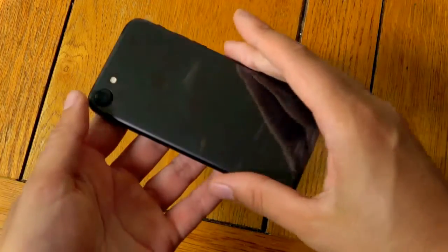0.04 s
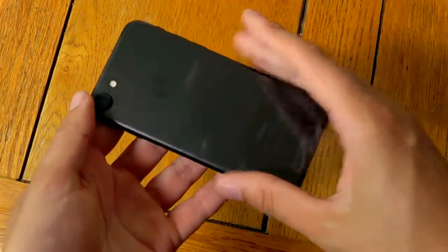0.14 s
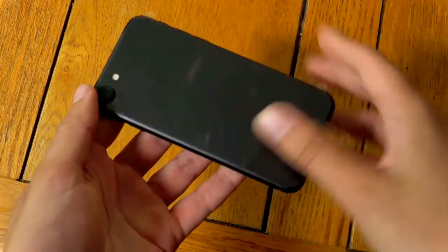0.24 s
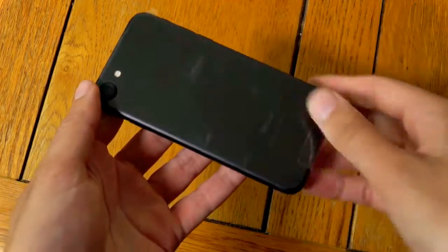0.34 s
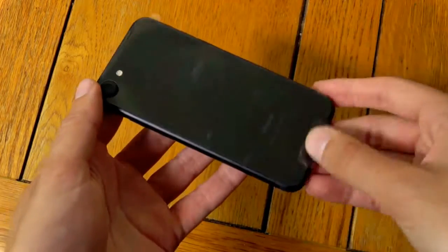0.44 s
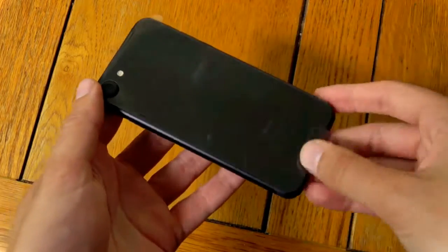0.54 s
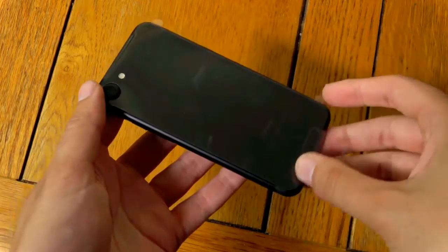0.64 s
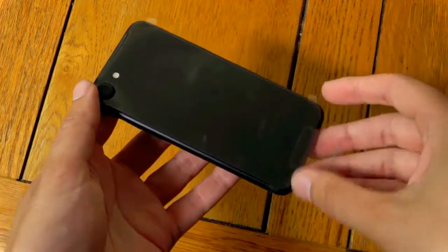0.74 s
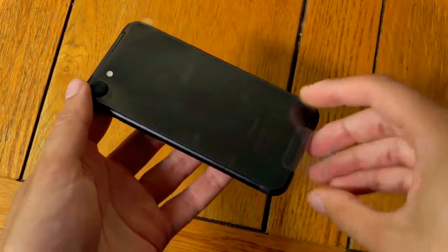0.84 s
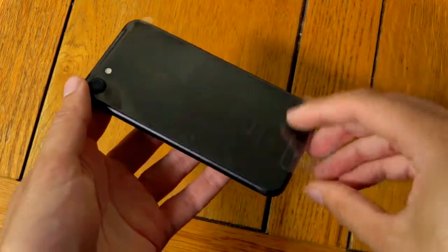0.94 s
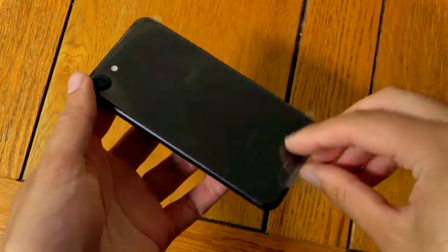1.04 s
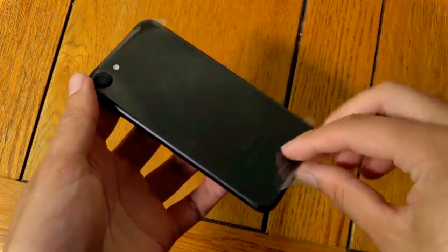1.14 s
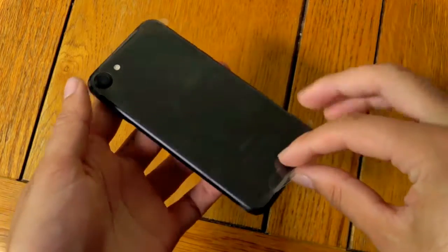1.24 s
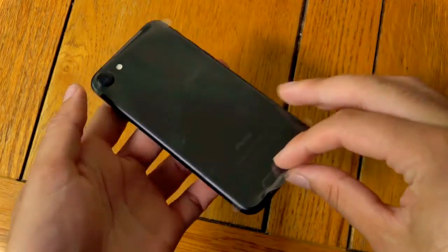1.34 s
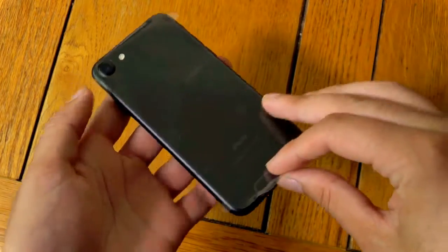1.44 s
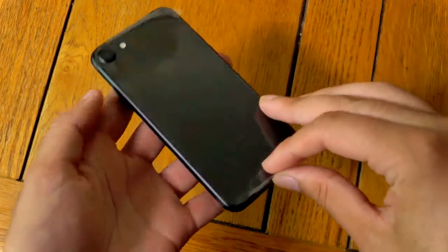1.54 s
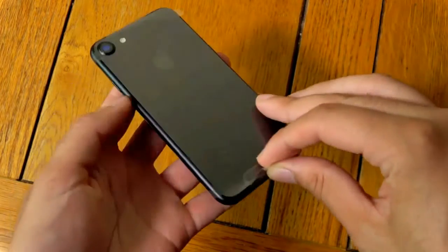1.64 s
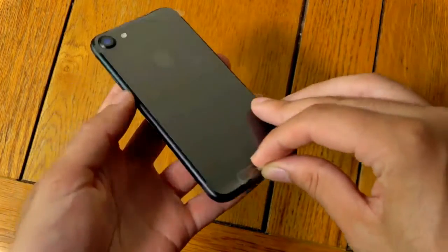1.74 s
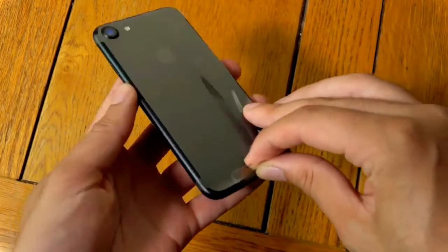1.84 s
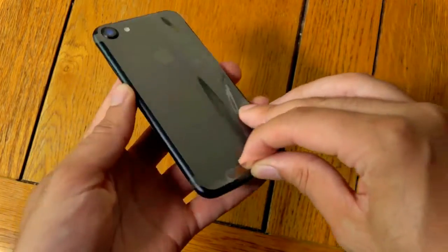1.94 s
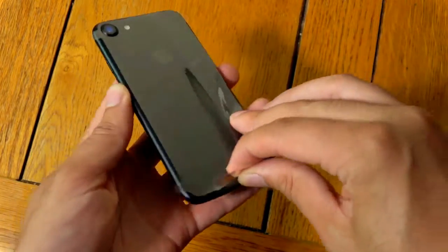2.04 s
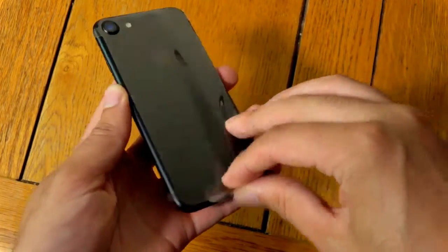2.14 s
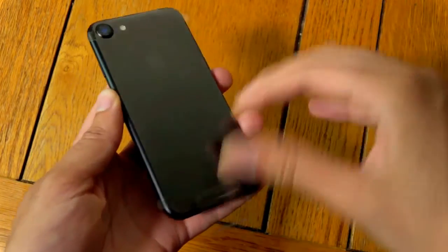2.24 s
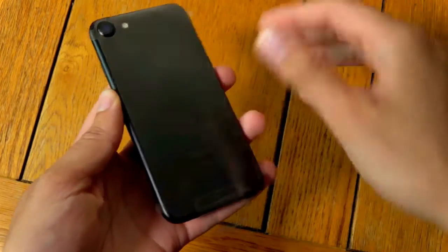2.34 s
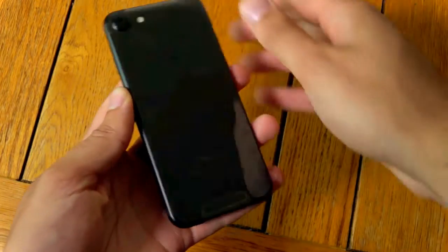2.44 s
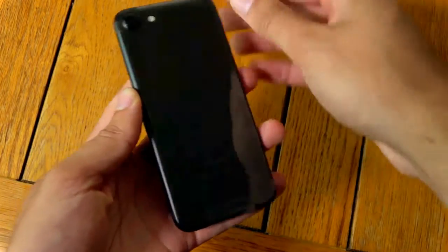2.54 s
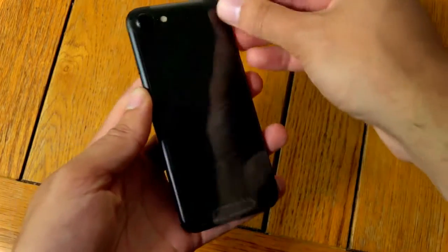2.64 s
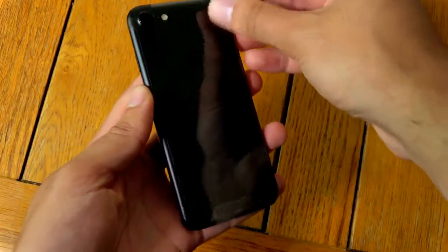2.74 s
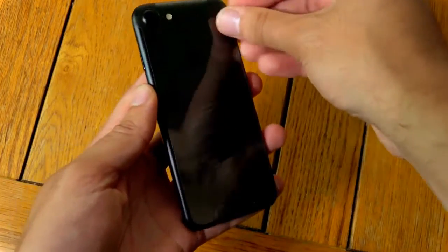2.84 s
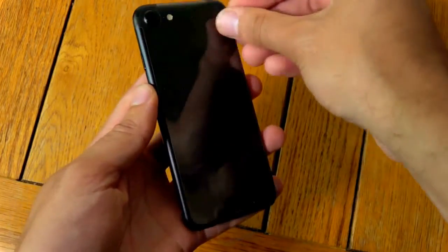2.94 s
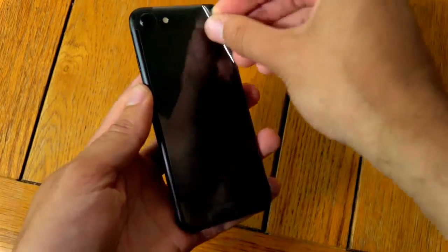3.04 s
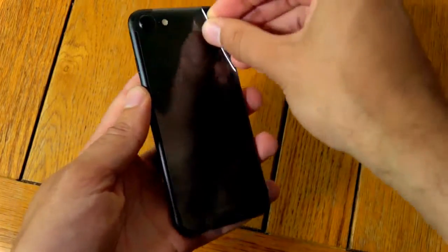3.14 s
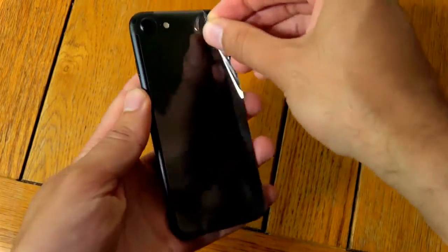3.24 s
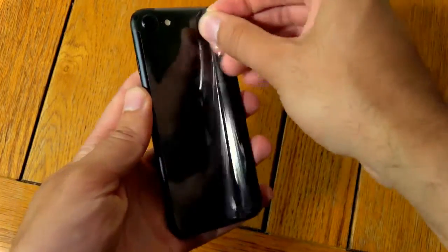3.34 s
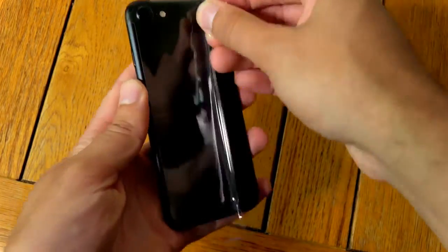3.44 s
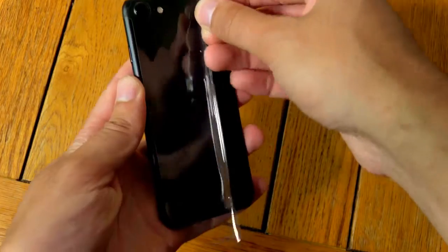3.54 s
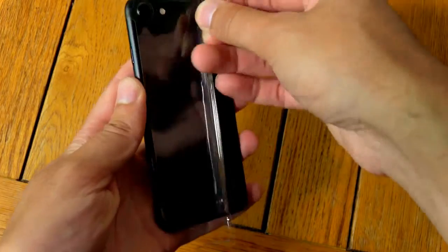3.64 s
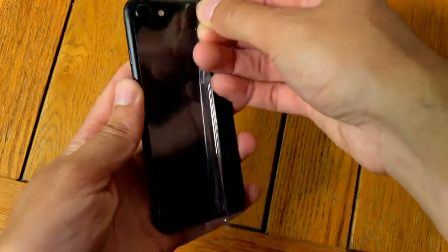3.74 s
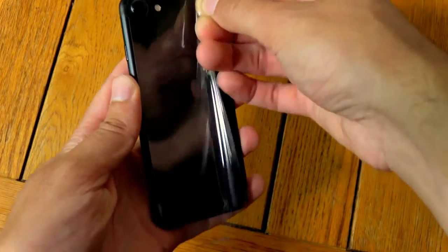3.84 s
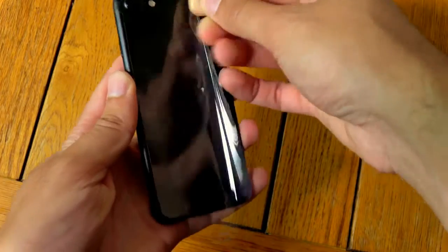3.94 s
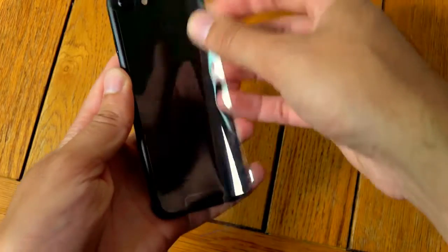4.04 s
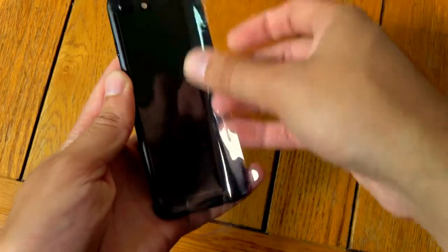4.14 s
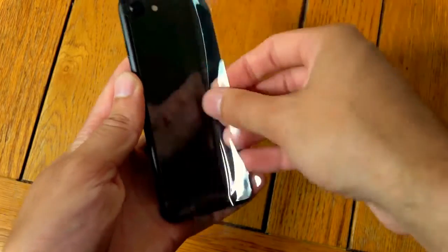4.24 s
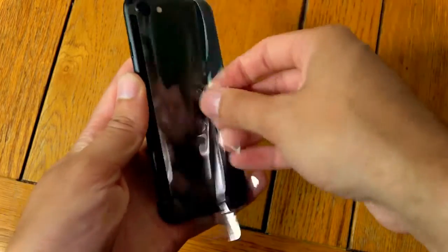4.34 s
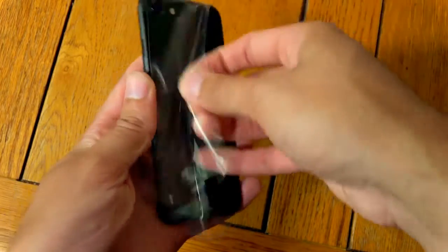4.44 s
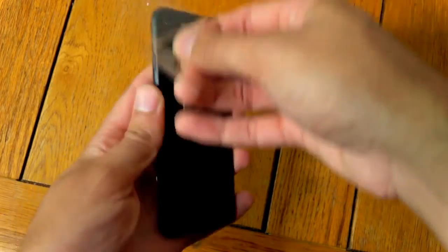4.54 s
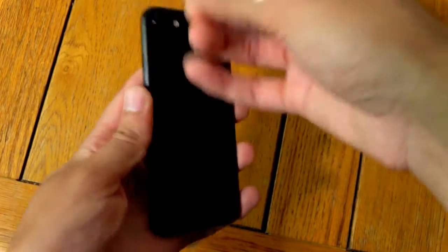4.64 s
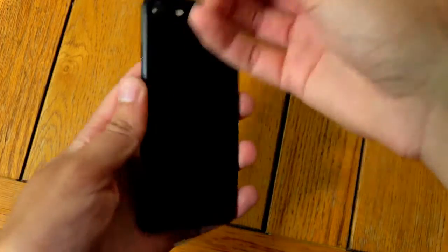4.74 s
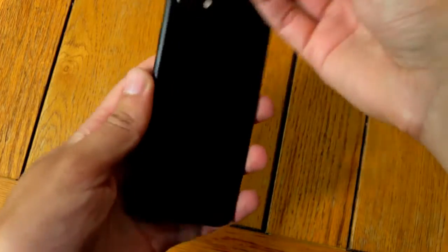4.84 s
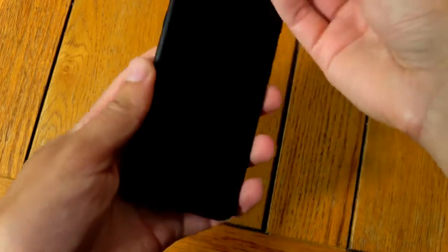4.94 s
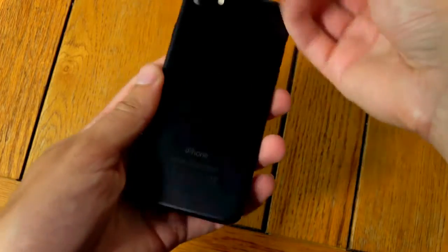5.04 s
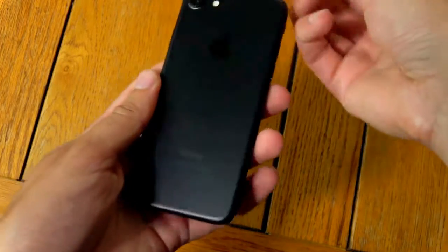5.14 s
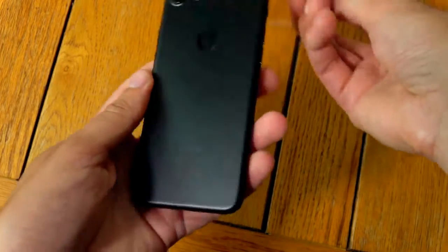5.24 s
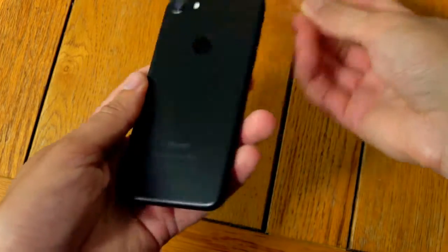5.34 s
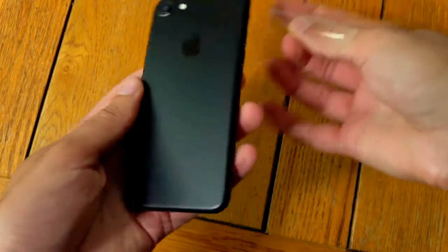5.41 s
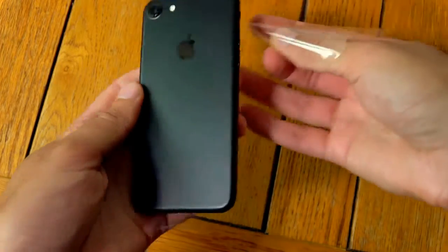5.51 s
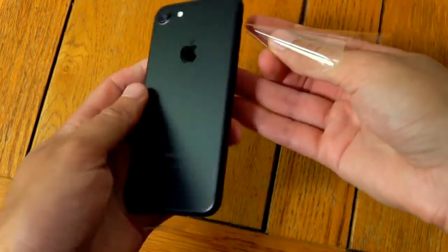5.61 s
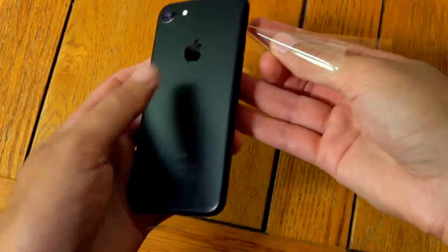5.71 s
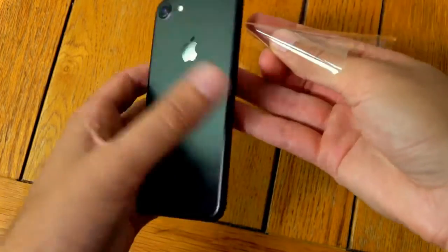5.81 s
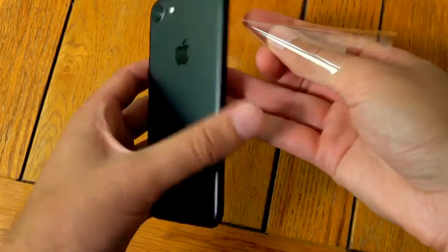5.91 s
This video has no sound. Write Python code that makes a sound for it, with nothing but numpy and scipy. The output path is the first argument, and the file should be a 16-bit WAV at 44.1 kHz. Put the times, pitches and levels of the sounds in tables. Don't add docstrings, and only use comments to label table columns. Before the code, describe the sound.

Very close stereo sound of protective film coming off a handheld slab in a small hard room. Faint nail ticks and soft rubs come first, then isolated snaps as the edge lifts, harder tugs, a fast tearing run of bright crackles, and finally crumpling with hollow pops in the cupped hand. Quiet hiss, hum and low handling rumble lie beneath.

```python
import sys
import numpy as np
from scipy import signal
from scipy.fft import rfft, irfft
from scipy.io import wavfile
from scipy.ndimage import uniform_filter1d

SR = 44100
rng = np.random.default_rng(int(sys.argv[2]) if len(sys.argv) > 2 else 0)


def log_audio(samples):
    frames = np.atleast_2d(samples).T
    limited = np.clip(frames, -1, 1)
    pcm = np.round(limited * 32767).astype(np.int16)
    wavfile.write(sys.argv[1], SR, pcm)


def gain_from_db(level_db):
    decades = np.asarray(level_db, float) / 20
    return 10 ** decades


N = 263484


def unit(x):
    return x / np.sqrt(np.mean(x ** 2) + 1e-30)


def ring(x, hz, width_hz):
    return signal.lfilter(*signal.iirpeak(hz, hz / width_hz, SR), x)


def band(x, lo_hz, hi_hz):
    return signal.lfilter(*signal.butter(2, [lo_hz, hi_hz], "bandpass", fs=SR), x)


def add(out, s, x):
    i = int(s * SR)
    out[..., i:i + x.shape[-1]] += x[..., :N - i]


def slips(size, rate, spread_db, lag):
    when = rng.random(size)
    big = rng.exponential(size=size)
    apart = rng.standard_normal(size)
    at = np.r_[0, np.flatnonzero(when < rate / SR)]
    sign = np.sign(when[::-1][at] - .5)
    gain = gain_from_db(spread_db * big[at]) * sign
    delay = np.clip(np.round(lag * apart[at]), -7, 7).astype(int)
    out = np.zeros((2, size + 16))
    np.add.at(out[0], at + 8, gain)
    np.add.at(out[1], at + 8 + delay, gain)
    return out


def sheet(x):
    # pitch in Hz, width in Hz, level in dB.
    modes = [(10300, 4500, 0), (7600, 2600, -3), (13500, 4000, -5)]
    return band(sum(gain_from_db(db) * ring(x, hz, width_hz) for hz, width_hz, db in modes), 5000, 16000)


def crack_rows():
    # start in seconds, length in ms, sheet treble in dB, crease in dB, crease in Hz.
    lifts = [(.4032, 2.7, -39, -53, 3300), (.4087, 2, -40.5, -40, 3530), (.476, 12, -54, -61, 2000),
             (.635, 2.3, -56, -58, 3300), (.8646, 3.7, -64, -57, 2500), (1.0796, 2.6, -42, -37, 4700),
             (1.38, 2.78, -29, -23, 2100), (1.4635, 0.87, -30, -37, 4800),
             (1.4729, 1.8, -16.5, -25.5, 5160), (1.4735, 2.3, -37, -28, 2480),
             (1.4795, 2.2, -42, -39, 5000), (2.4648, 1.26, -54, -34, 2880), (2.4743, 1.5, -37, -49.5, 4000),
             (2.5003, 0.85, -14, -18, 3020), (2.5016, 1.6, -8.5, -20, 4300),
             (2.5046, 3.25, -8, -19.5, 3730), (2.4975, 2.05, -39, -55.5, 3500),
             (2.9676, 2.64, -60, -55.5, 1800), (3.113, 2.8, -48.5, -46, 2620),
             (3.1628, 1.53, -25, -43, 2960), (3.1632, 2.1, -45, -35, 1960)]
    tugs = [(3.553, 1.2, -2.5, -30, 5070), (3.5531, 1.33, -14.5, -13, 4860), (3.552, 1.1, -44, -27, 2200),
            (3.654, 2.3, -3, -3.5, 4620), (3.778, 8.4, -22.5, -25, 3900), (3.845, 3.1, -42, -36, 2400),
            (3.876, 5.3, -46, -35.5, 1500), (3.9382, 2.6, -31, -36, 4000), (4.4084, 1.3, -55, -52, 1500),
            (3.9951, 0.94, -11.5, -13.5, 5640), (3.9978, 1.6, -27, -29, 5000),
            (3.999, 2.97, -43.5, -32.5, 2680), (4.104, 5.9, -36, -44, 2500),
            (4.1166, 2.4, -40.4, -34, 3150), (4.157, 2.4, -39, -38, 2500), (4.193, 3.84, -6.5, -18.5, 3520),
            (4.2894, 2.94, -7, -15.5, 4820), (4.5843, 1.46, -32.5, -31, 2380)]
    tears = [(4.6405, 3, -11, -29, 3920), (4.6526, 2, -30, -24.5, 2970), (4.6623, 1.4, -5.5, -18, 4110),
             (4.682, 2.1, -5, -19, 4080), (4.6905, 3.5, -20, -31, 4130), (4.698, 3.4, -22, -36, 3800),
             (4.7182, 1.3, -18, -17.5, 3370), (4.7211, 3.5, -7.5, -18, 3235), (4.7311, 1, -15, -51, 4500),
             (4.7388, 4.2, -16.5, -36.5, 3820), (4.7557, 3.7, -3.5, -13, 3710),
             (4.765, 1.3, -18.5, -12.5, 3800), (4.632, 1, -56, -54, 2800),
             (4.7731, 7.2, -18.5, -20.5, 3420), (4.7852, 10, -11, -15.5, 4160),
             (4.7959, 8.8, -1.5, -7.5, 4470), (4.8044, 4, -11, -13.5, 4600), (4.8103, 2.6, -16, -18, 4170),
             (4.8163, 3, -10.5, -21, 4350), (4.8225, 4, -7.5, -12.5, 3770)]
    crumples = [(5.016, 0.9, -35, -31.5, 2600), (5.0209, 0.63, -23, -31.0, 2900),
                (5.0333, 3.5, -4.5, -16.5, 3750), (5.0806, 4.4, -25.5, -26.5, 2800),
                (5.0834, 1.8, -8, -16.5, 3170), (5.117, 2.2, -27, -28, 3400),
                (5.1292, 1.7, -16, -18.5, 4000), (5.1337, 4.5, -5.5, -10.5, 3850),
                (5.1714, 2.7, -7.5, -13.5, 3300), (5.2085, 2.4, -32, -29.5, 3030),
                (5.2267, 1.1, -29, -28, 3060), (5.2464, 1.16, -33.5, -32, 3280),
                (5.3199, 1.9, -35, -42, 3300), (5.456, 1.8, -26, -35.5, 2750),
                (5.4759, 2.8, -15, -15.5, 3860), (5.4962, 2, -12, -17.5, 4650),
                (5.5029, 4.5, -3, -13, 3660), (5.534, 4.1, -23, -20, 3900), (5.5401, 8.3, -5.5, -14, 3920),
                (5.5621, 2.8, -37.4, -19.5, 4130), (5.663, 2.5, -40, -44, 3200),
                (5.6744, 2.3, -26.5, -22, 2820), (5.7044, 2.4, -38, -34, 4300),
                (5.7074, 4.8, -19, -23, 3200), (5.7294, 1.8, -34.8, -38, 4100),
                (5.779, 8.2, -34.9, -37.5, 3700), (5.8018, 0.93, -13.5, -29, 3900),
                (5.805, 0.95, -7.5, -24, 4340), (5.808, 1.6, -8.5, -15, 3490),
                (5.8125, 0.6, -22, -16.5, 3300), (5.815, 2.6, -11, -20, 3670)]
    # start in seconds, sheet treble in dB, crease in dB.
    tick_rows = [(.1002, -76, -61), (.289, -70, -60), (.4873, -41, -62), (.9237, -59, -65),
                 (.9754, -51, -61), (1.046, -59, -72), (1.053, -55, -60), (1.0668, -46, -65),
                 (1.0875, -61, -44.5), (1.616, -55, -60), (2.0252, -49, -67), (2.1706, -51, -80),
                 (2.2396, -49.5, -80), (2.247, -55, -78), (2.262, -61, -78.5), (2.276, -46, -76),
                 (2.3085, -50, -72), (2.3582, -63, -65.5), (2.4522, -43, -66), (2.458, -46, -56),
                 (2.4947, -44, -42), (2.488, -60, -65), (2.616, -66.5, -59.5), (2.6963, -83.5, -63),
                 (3.3921, -57, -67), (4.428, -71, -64), (4.552, -47, -47.5), (4.5618, -69, -50.5),
                 (5.369, -46, -40), (5.3742, -46, -50), (5.379, -51, -46), (5.433, -41, -54),
                 (5.45, -45, -48)]
    tick_ms = 2
    ticks = [(s, tick_ms, treble_db, crease_db, 4500 + 49.5 * crease_db)
             for s, treble_db, crease_db in tick_rows]
    return lifts + tugs + tears + crumples + ticks


def cracks():
    # time in seconds, knock heard directly in dB, knock sent to the walls in dB.
    knocks = [(.4, 2, 4), (1.38, -6.5, -3.5), (1.47, -4.5, -5), (2.5, -1, 0), (3.16, 3, 2),
              (3.553, -10, -19), (3.654, -21, -9.5), (3.78, 1, 2.5), (3.995, -3.5, 4.5), (4.19, 0.5, 0),
              (4.29, -4, -1.5), (4.64, 0.5, 6), (4.72, -4, -2), (4.8, -1, 1), (5.03, 5, 4), (5.17, -2, 3),
              (5.32, -12, -14), (5.37, 0, -4), (5.456, -4.5, 0.5), (5.5, -2, 0), (5.7, 1.5, 0.5),
              (5.81, 2, 1)]
    knock_s, knock_near_db, knock_far_db = np.transpose(knocks)
    snap, hold = 0.85, 1.15
    blend = 0.36
    wall_edge = 0.49
    out, t = np.zeros((4, N)), np.arange(1416) / SR
    for s, ms, treble_db, crease_db, hz in crack_rows():
        length = ms / 1000
        shape = (snap + t / length) * np.exp(-t / length) / (1 + (t / length / hold) ** 6)
        burst = slips(size=1400, rate=9000, spread_db=2.5, lag=.85) * shape
        wall_click = signal.unit_impulse(len(t), int(length * SR / 2))
        x = np.vstack([burst, wall_click])

        treble_hz = np.clip(9400 + 124 * (treble_db - crease_db), 6000, 13000)
        treble = ring(sheet(x), treble_hz, .55 * treble_hz)

        crease = ring(band(x, .58 * hz, min(2 * hz, 6500)), hz, min(.65 * hz, 2300))
        crease[:2] = crease[:2] + blend * crease[1::-1]
        crease[2] = band(band(crease[2], wall_edge * hz, 9000), wall_edge * hz, 14000)

        thud = band(band(x, 320, 3200), 280, 2257)
        thud[:2] = thud[:2] + blend * thud[1::-1]
        near_db = np.interp(s, knock_s, knock_near_db)
        far_db = np.interp(s, knock_s, knock_far_db)
        thud_db = crease_db - 10.0 + near_db + 0.47 * np.log2(3600 / hz)
        thud_wall_db = 3.5 + far_db - near_db

        parts = ((treble, treble_db + 0.17, 0), (crease, crease_db + 0.12, 0), (thud, thud_db, thud_wall_db))
        for part, db, wall_db in parts:
            wall_rows = np.array([[part is not crease], [part is crease]])
            heard = np.vstack([unit(part[:2]), gain_from_db(wall_db) * unit(part[2:]) * wall_rows])
            add(out, s - 8 / SR, gain_from_db(db) * heard * np.sqrt(length * SR / len(t)))
    return out


def rubs(rows, ends_db, rate, spread_db, from_hz, to_hz, count=2, width=.36):
    out = np.zeros((2, N))
    for start, strongest, end, treble_db, crease_db in rows:
        n = int((end - start) * SR)
        t = start + np.arange(n + 16) / SR
        x = slips(size=n, rate=rate, spread_db=spread_db, lag=.8)
        edge = np.clip(np.minimum(t - start, end - t) / .006, 0, 1)
        grip = unit(uniform_filter1d(rng.standard_normal((2, len(t))), size=300))
        effort = gain_from_db(np.interp(t, (start, strongest, end), (ends_db, 0, ends_db)) + 3.0 * grip)

        taut = (t - start) / (end - start)
        film, high = sheet(x), 0
        for k, hz in enumerate(np.linspace(from_hz, to_hz, count)):
            share = np.clip(1 - abs(taut * (count - 1) - k), 0, 1)
            high = high + share * unit(ring(ring(film, hz, width * hz), hz, 2 * width * hz))
        high = gain_from_db(treble_db) * unit(high)

        crease_hz = np.clip(1693.0 + 60 * (treble_db - crease_db), 1200, 3500)
        low = gain_from_db(crease_db) * unit(ring(band(x, 700, 4200), crease_hz, 2000))
        add(out, start, edge * (effort[0] * high + effort[1] * low))
    return out


def sliding_film():
    # start, strongest moment and end in seconds, treble in dB, crease in dB.
    slides = [(.06, .2, .52, -86, -75), (.69, .714, .8, -69, -82), (.9, .93, .96, -63, -72),
              (.96, .98, 1.0, -60, -62), (1.0, 1.03, 1.07, -67, -76), (1.13, 1.168, 1.22, -72, -75),
              (1.32, 1.34, 1.37, -55.5, -65), (2.165, 2.18, 2.21, -59.5, -76),
              (2.22, 2.29, 2.37, -58.5, -76), (2.41, 2.47, 2.49, -55.5, -67),
              (3.07, 3.09, 3.115, -64.5, -71), (3.26, 3.306, 3.34, -64, -71.5),
              (3.418, 3.43, 3.442, -55.5, -64.5), (3.83, 3.87, 3.91, -43, -38),
              (3.89, 3.935, 3.946, -35, -48), (3.94, 3.96, 3.99, -53, -53), (5.49, 5.496, 5.5, -25, -24),
              (5.525, 5.535, 5.54, -25, -24.5), (5.552, 5.562, 5.572, -37, -40),
              (4.085, 4.11, 4.135, -39.5, -50.5), (4.155, 4.165, 4.19, -51, -52),
              (5.34, 5.38, 5.42, -57, -49), (5.41, 5.46, 5.47, -47.5, -49.5),
              (5.755, 5.783, 5.792, -35.5, -44), (5.715, 5.724, 5.729, -48, -51)]
    rip = [
        (4.78, 4.808, 4.84, -11.5, -23),
        (4.83, 4.84, 4.97, -32.5, -36),
    ]
    stretch = [
        (4.37, 4.46, 4.565, -51.5, -69.5),
    ]
    folds = [(3.842, 3.872, 3.91, -38.5, -60), (3.91, 3.936, 3.945, -38, -58), (4.1, 4.12, 4.14, -45, -62),
             (4.59, 4.61, 4.635, -56.5, -52), (.9, 0.99, 1.0, -60, -81), (2.43, 2.47, 2.498, -59.5, -76.5),
             (3.418, 3.43, 3.442, -66, -77), (4.155, 4.17, 4.19, -48.5, -65.5),
             (4.37, 4.42, 4.55, -60, -70), (5.522, 5.534, 5.54, -28, -34.5), (5.34, 5.38, 5.47, -55, -75.5),
             (4.783, 4.805, 4.835, -19.5, -31)]
    out = rubs(slides, ends_db=-10, rate=9000, spread_db=2.2, from_hz=10300, to_hz=11000)
    out += rubs(rip, ends_db=-21, rate=8000, spread_db=3, from_hz=10500, to_hz=9000)
    out += rubs(stretch, ends_db=-4, rate=14000, spread_db=1.5, from_hz=9000, to_hz=16000, count=6, width=.22)
    out += rubs(folds, ends_db=-10, rate=7000, spread_db=2.5, from_hz=5200, to_hz=4800)
    return out


def pops():
    # start in seconds, peak in dB, pitch in Hz, length in seconds.
    hollows = [(.407, -44, 684, 0.0039), (.487, -63, 1560, .005), (0.634, -48, 3350, 0.0055),
               (0.864, -55, 1490, .007), (1.079, -45, 1956, 0.014), (1.0807, -46.5, 660, 0.026),
               (1.381, -32, 1836, .01), (1.3811, -35, 1110, 0.0041), (2.502, -22.5, 1081, 0.0055),
               (2.616, -47, 1150, 0.0051), (2.63, -53, 1490, 0.0075), (2.696, -56.5, 1190, .006),
               (2.967, -49.5, 555, 0.0055), (2.968, -46.5, 3100, 0.0039), (2.969, -44, 1196, 0.0032),
               (3.112, -46.5, 1770, 0.0063), (3.163, -50, 690, 0.0077), (3.1633, -43, 2770, .005),
               (3.551, -37, 196, 0.0045), (3.876, -32.5, 1434, 0.015), (4.118, -43, 2980, .005),
               (4.427, -47.5, 810, 0.0048), (5.038, -25, 303, 0.0079), (5.088, -25, 398, 0.0088),
               (5.101, -36, 477, 0.019), (5.152, -17, 538, 0.005), (5.1703, -13.5, 530, 0.013),
               (5.199, -36, 470, 0.013), (5.226, -30.5, 550, 0.011), (5.245, -34, 517, .0064),
               (5.32, -41.5, 1300, .005), (5.373, -38, 820, 0.0057), (5.375, -37.5, 402, .014),
               (5.379, -41, 1200, 0.0067), (5.408, -39.5, 620, 0.0086), (5.411, -45, 257, .012),
               (5.456, -42, 1400, .005), (5.773, -34, 3530, .012)]
    out, t = np.zeros(N), np.arange(5000) / SR
    for s, db, hz, length in hollows:
        fade = gain_from_db(db - 7 * t / length) / (1 + (t / length) ** 6)
        waver = 1 + 0.04 * unit(uniform_filter1d(rng.standard_normal(len(t)), size=80))
        add(out, s, fade * np.sin(2 * np.pi * hz * np.cumsum(waver) / SR))
    return out


def flutter():
    # start, strongest moment and end in seconds.
    shiver_s = (5.02, 5.14, 5.26)
    start, _, end = shiver_s
    level_db, hz, width_hz = -39, 460, 400
    out, n = np.zeros(N), int((end - start) * SR)
    t = start + np.arange(n + 16) / SR
    slaps = slips(size=n, rate=300, spread_db=1.0, lag=0)[0]
    hollow = ring(ring(slaps, hz, width_hz), hz, 2 * width_hz)
    swell_db = np.interp(t, shiver_s, (-5, 0, -9))
    add(out, start, gain_from_db(level_db + swell_db) * unit(hollow))
    return out


def whispers():
    # start in seconds, level in dB, pitch in Hz, length in seconds.
    narrow_folds = [(0.109, -64, 3570, 0.037), (0.111, -69, 2900, .04), (.11, -74, 1750, .11),
                    (.3, -69, 1860, .09), (0.415, -72, 1910, 0.067), (0.637, -66, 3300, .05),
                    (0.857, -64, 3020, .015), (1.09, -63, 2800, 0.022), (2.503, -36, 3720, 0.045),
                    (2.975, -67.5, 3050, .05), (2.979, -67.5, 1215, .04), (3.113, -59, 6240, 0.027),
                    (3.85, -52, 549, 0.08), (4.096, -49, 2420, .05), (4.158, -45, 2900, 0.032),
                    (4.164, -53, 1800, .025), (5.255, -56, 498, 0.09)]
    width = 0.0815
    out, t = np.zeros(N), np.arange(8000) / SR
    for s, db, hz, length in narrow_folds:
        x = ring(ring(rng.standard_normal(len(t)), hz, width * hz), hz, 2 * width * hz)
        fade = gain_from_db(db - 6 * t / length) / (1 + (t / length) ** 6)
        add(out, s, fade * unit(x))
    return out


def puffs():
    # start in seconds, peak in dB.
    puff_rows = [(3.553, -34), (4.192, -38.5), (4.681, -34.5), (4.758, -23.5), (4.795, -25), (4.823, -22.5),
                 (5.033, -28), (5.135, -30.5), (5.17, -35), (5.503, -26.5), (5.538, -26.5), (5.813, -40.5),
                 (5.74, -54)]
    out, t = np.zeros((2, N)), np.arange(3000) / SR
    for s, db in puff_rows:
        hz = 90 * 2 ** (.6 * rng.standard_normal((2, 1)))
        port_db = db + np.array([[5], [3]])
        add(out, s, gain_from_db(port_db) * np.exp(-t / .007) * np.sin(2 * np.pi * hz * t))
    return out


def room(x, crease):
    # band centre in Hz, time to fade by 60 dB in seconds.
    fades = [(220, .3), (450, .3), (900, .31), (1800, .31), (3200, .28), (5000, .27), (7500, .25),
             (10500, .23), (13000, .22), (15000, .21)]
    band_db = [-3, -10, -10, -8, -9, -7.5, -15, -12.5, -28.5, -18.5]
    # delay in seconds, level in dB.
    echoes = [(.0085, -24), (.0178, -25)]
    t, tail = np.arange(SR // 2) / SR, 0
    grain = gain_from_db(1.6 * unit(uniform_filter1d(rng.standard_normal(len(t)), size=40)))
    for (hz, t60), db in zip(fades, band_db):
        noise = rng.standard_normal((3, len(t)))
        common = .6 if hz > 2500 else .9
        noise = band(grain * (noise[:2] + common * noise[2]), hz / 1.35, min(hz * 1.3, 16000))
        tail = tail + gain_from_db(db) * np.sqrt(hz / SR / len(t)) * unit(gain_from_db(-60 * t / t60) * noise)
    tail = tail * np.clip(t / .003, 0, 1)
    tail = tail * (1 + 1.0 * np.exp(-t / .02))
    for s, db in echoes:
        add(tail, s, gain_from_db(db) * unit(rng.standard_normal((2, 12))) / np.sqrt(12))
    main = signal.fftconvolve(x[None], tail, axes=1)
    crease_tail = signal.fftconvolve(crease[None], tail[::-1], axes=1)
    return (main + crease_tail)[:, :N]


def background():
    # frequency in Hz, density in dB per Hz.
    hiss = [(210, -9), (350, -43), (532, 12), (677, 8), (1420, 1.5), (2300, -1), (13100, -6), (16400, -11)]
    # pitch in Hz, level in dB.
    hum = [(48.4, -62.5), (689.1, -76), (1007, -81)]
    # time in seconds, level in dB.
    hands = [(0.0, -50), (1.51, -56), (1.89, -56), (2.36, -51), (2.62, -50), (2.67, -49), (2.71, -54),
             (2.75, -40), (2.82, -50.5), (3.07, -46.5), (3.41, -48.5), (3.94, -54), (4.94, -49),
             (5.22, -56), (5.45, -55), (5.65, -49.5), (5.97, -47.5)]
    # middle in seconds, level in dB, half length in seconds.
    waves = [
        (2.3, -71.5, 0.1),
        (2.743, -82, 0.025),
        (4.946, -53.5, 0.2),
        (5.44, -51.5, 0.079),
        (5.544, -33, .04),
        (5.698, -49, 0.061),
    ]
    t = np.arange(N) / SR
    f = np.maximum(np.arange(N // 2 + 1) * SR / N, 1)
    noise = rng.standard_normal((3, N))
    noise = noise[:2] + 0.51 * noise[2]

    hiss_hz, hiss_db = np.transpose(hiss)
    colour = gain_from_db(np.interp(np.log(f), np.log(hiss_hz), hiss_db))
    out = gain_from_db(-65.5 + 2.0) * unit(irfft(rfft(noise) * colour, N))

    swell = unit(uniform_filter1d(uniform_filter1d(rng.standard_normal(N), size=4000), size=4000))
    rumble_db = np.interp(t, *np.transpose(hands)) + 2.0 * swell
    out += gain_from_db(rumble_db) * unit(band(band(noise - 0.23 * noise[::-1], 12, 58), 10, 75))

    murmur = gain_from_db(-64 + 0.62 * (rumble_db + 53.5))
    for s, db, half in waves:
        murmur = murmur + gain_from_db(db) * np.exp(-((t - s) / half) ** 2)
    out += murmur * unit(band(noise, 100, 380))

    for hz, db in hum:
        out += gain_from_db(db) * unit(ring(noise[::-1, ::-1], hz, 6))
    return out


def scene():
    heard = cracks()
    near, far, far_crease = heard[:2], heard[2], heard[3]
    slide = sliding_film()
    flap = pops() + flutter() + whispers()
    walls = room(far + slide[0] + gain_from_db(-4.0) * flap, far_crease)
    return near + slide + flap + walls + puffs() + background()


def band_limit(x):
    return signal.sosfilt(signal.butter(12, 16520, fs=SR, output="sos"), x)


def record(dry):
    top_cut = signal.ellip(9, .3, 45, 15850, fs=SR, output="sos")
    mix = np.clip(signal.sosfilt(top_cut, dry), -.99, .99)
    return band_limit(mix)


dry = scene()
out = record(dry)
log_audio(out)
```